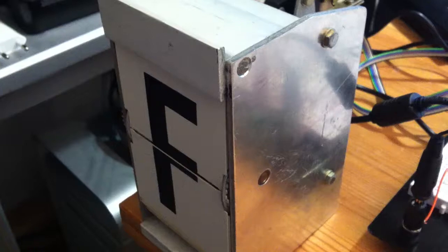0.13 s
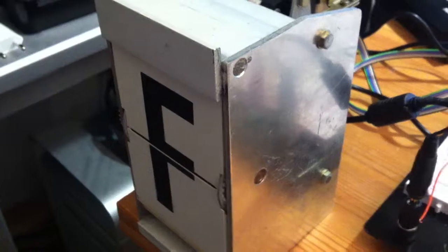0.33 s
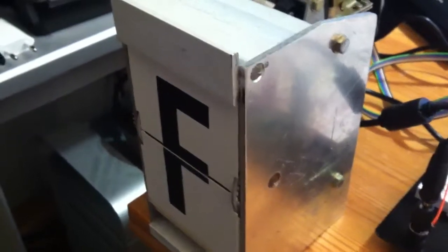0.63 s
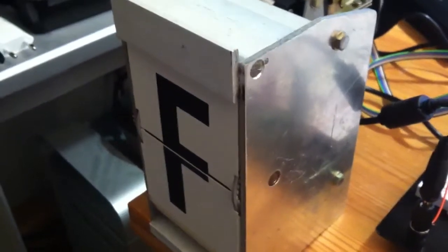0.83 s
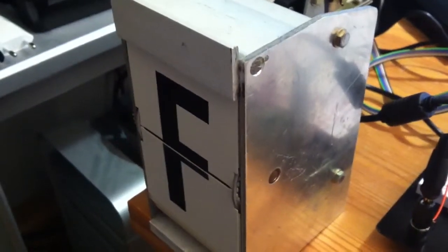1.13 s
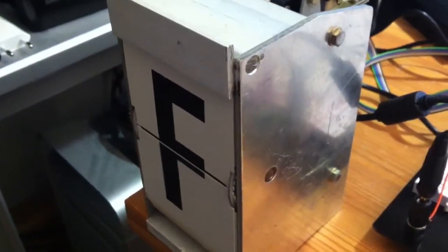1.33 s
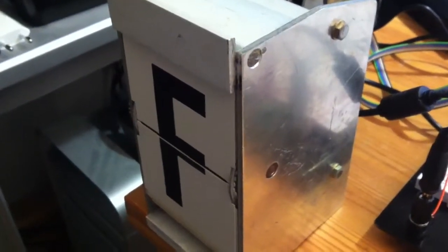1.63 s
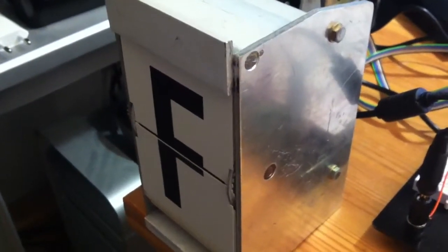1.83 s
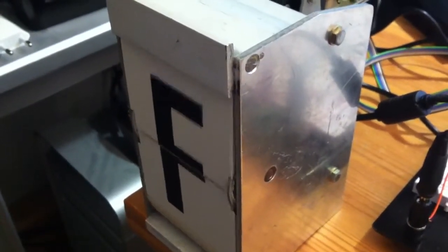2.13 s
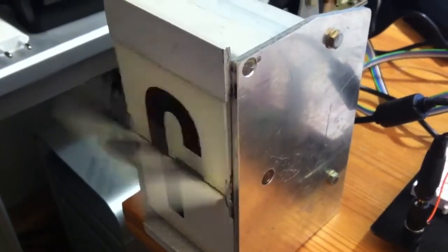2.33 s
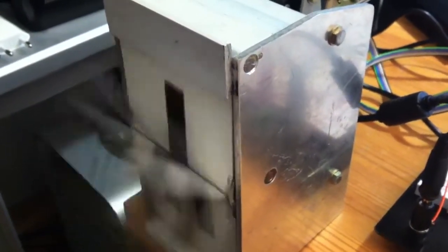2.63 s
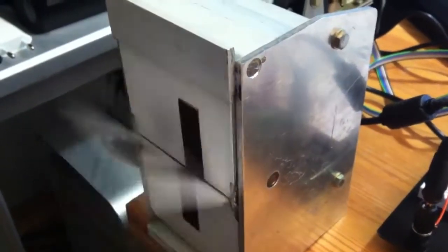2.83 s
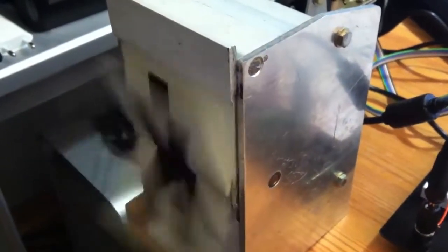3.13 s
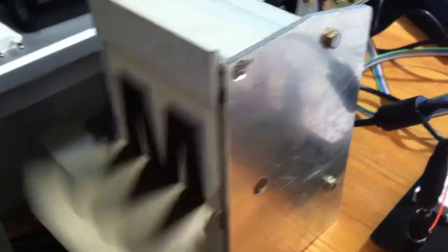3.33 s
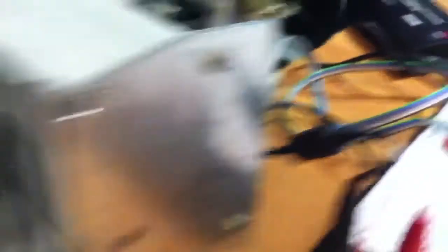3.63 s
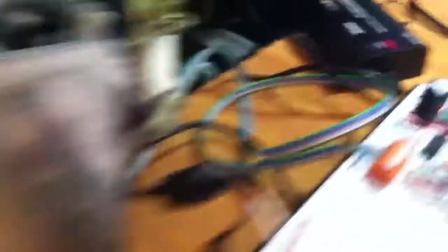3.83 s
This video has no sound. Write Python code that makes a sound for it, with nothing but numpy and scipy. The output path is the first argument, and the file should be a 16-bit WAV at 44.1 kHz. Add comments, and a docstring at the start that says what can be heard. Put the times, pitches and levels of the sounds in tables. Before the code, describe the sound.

A split-flap display starts flipping on a desk, close and mono. After a tiny silence, low steady hiss and hum; faint key clicks at 1.8 and 1.87 s. From 2.2 s to the end at 4 s, about six steps a second: tick, short gap, bright metallic tooth rattle, then flap slaps with hollow thumps. Hardest snap near 2.78 s, brief squeak at 3.36 s; rustling, bass shaking and short room tail.

```python
"""A split-flap drive steps about six times a second on a desk in a quiet room, close to a mono microphone. Each
step is a first tick, a short gap and a fast rattle of teeth: force envelopes on noise ring frame and plate.
Between steps flaps slap (noise cracks, resonant thumps), edges snap, brief tones squeak, the loose stack
rustles. Two key clicks come first. Behind it all: a short room tail, a lumpy low rumble, steady hiss and
humming bands."""
import sys
import numpy as np
from scipy import signal
from scipy.fft import rfft, irfft, next_fast_len
from scipy.io import wavfile
from scipy.ndimage import map_coordinates

SR = 44100
rng = np.random.default_rng(int(sys.argv[2]) if len(sys.argv) > 2 else 0)


def store_wav(level_fs):
    """Save 16-bit WAV to argv[1]."""
    pcm = np.round(np.clip(np.atleast_2d(level_fs), -1, 1) * 32767)
    wavfile.write(sys.argv[1], SR, pcm.T.astype(np.int16))


N = 176400


def amp(db):
    """Decibels to amplitude."""
    return 10 ** (np.asarray(db) / 20)


def unit(x):
    """Scale to rms 1."""
    return x / np.sqrt(np.mean(x ** 2) + 1e-20)


def along(points, hz):
    """Interpolate (f/Hz, value) points on a log frequency axis."""
    f, value = np.transpose(points)
    return np.interp(np.log(hz + 1), np.log(f + 1), value)


def level(rows):
    """A (t/s, level/dB) curve per sample, at -120 dB before its first point."""
    s, db = np.transpose(rows)
    return np.interp(np.arange(N) / SR, s, db, left=-120)


def wobble(rate):
    """A smooth random curve with `rate` knots a second."""
    knots = rng.standard_normal(int(N * rate / SR) + 4)
    return map_coordinates(knots, [np.arange(N) * rate / SR])


def filtered(x, response):
    """Multiply the spectrum of x by a complex response of frequency."""
    m = next_fast_len(N + SR // 2)
    return irfft(rfft(x, m) * response(np.fft.rfftfreq(m, 1 / SR)), m)[..., :N]


def resonances(table):
    """Response of a body: a causal sum of damped resonances with alternating signs."""
    def response(f):
        return sum((-1) ** k * amp(db) * 1j * f * width / (centre ** 2 - f * f + 1j * f * width)
                   for k, (centre, width, db) in enumerate(table))
    return response


def noise(spectrum):
    """Coloured noise of rms 1."""
    return unit(filtered(rng.standard_normal(N), lambda hz: amp(along(spectrum, hz))))


def add_blow(envelope, s, db, t60, attack):
    """Add one blow to an envelope: quick rise, exponential fall."""
    t = np.arange(N) / SR - s
    on = slice(max(round(s * SR), 0), round(s * SR) + SR // 8)
    envelope[on] += amp(db - 60 * t[on] / t60) * (1 - np.exp(-np.abs(t[on]) / attack))


MODE_DRIFT_DB, MODE_DRIFT_RATE = 2, 40  # depth in dB, knots a second


def rung(force, table):
    """Noise under the force rings a body; each mode is caught more or less as the contact point moves."""
    grit = rng.standard_normal(N)
    total = 0
    for k, row in enumerate(table):
        caught = amp(MODE_DRIFT_DB * wobble(MODE_DRIFT_RATE))
        total = total + (-1) ** k * filtered(force * grit * caught, resonances([row]))
    return total / np.std(filtered(grit, resonances(table)))


# Spectrum of the steady hiss: f/Hz, relative level/dB per Hz
HUSH_SPECTRUM = [(15, -63), (25, -31), (70, -50), (86, -8), (211, -1.5), (284, -2.5), (324, -10.5),
                 (461, -15), (791, -11), (1820, -11), (15800, -20)]
# Humming bands: f/Hz, width/Hz, level/dB
HUM_BANDS = [(231, 90, -74), (470, 60, -74), (753, 6.7, -80)]
HUSH_DB = -63


def hush():
    """Steady hiss of the quiet room with a few humming bands of narrow noise."""
    hum = np.zeros(N)
    for row in HUM_BANDS:
        band = filtered(rng.standard_normal(N), resonances([row]))
        hum += amp(row[2]) * unit(band)
    return amp(HUSH_DB) * noise(HUSH_SPECTRUM) + hum


# Decay of the room: f/Hz, t60/s
ROOM_DECAY = [(300, 0.9), (1400, 0.63), (5000, 0.26), (10000, 0.17), (15000, 0.11)]
ROOM_DB = -11.5


def room(x):
    """Diffuse room tail: each frequency dies at its own speed; a new tail every fifth of a second."""
    out, hop = np.zeros(N + SR), SR // 5
    for i in range(0, N, hop):
        hz, t, z = signal.stft(rng.standard_normal(SR // 2), SR, nperseg=256)
        decay = amp(-60 * t / along(ROOM_DECAY, hz)[:, None])
        tail = signal.istft(z * decay, SR, nperseg=256)[1]
        wet = signal.fftconvolve(x[i:i + hop], tail / np.linalg.norm(tail))
        out[i + 200:][:len(wet)] += wet  # 200 samples behind the direct sound
    return out[:N]


# Low rumble that comes and goes: t/s, relative level/dB
RUMBLE_CURVE = [(2.2, -79), (2.48, -70), (2.72, -90), (3.012, -67), (3.036, -86), (3.102, -55),
                (3.192, -82), (3.858, -58), (4.0, -81)]
# Its spectrum: f/Hz, relative level/dB per Hz
RUMBLE_SPECTRUM = [(20, -20), (30, -9), (110, -2), (160, -16), (300, -60)]


def rumble():
    """Lumpy bass noise that swells and fades."""
    return amp(level(RUMBLE_CURVE) - 7.5 + 2.4 * wobble(17)) * noise(RUMBLE_SPECTRUM)


# Loose flaps shifting: t/s, relative level/dB
RUSTLE_CURVE = [(2.22, -75), (2.284, -45), (2.402, -61), (2.456, -49.5), (2.586, -55), (2.704, -54),
                (2.804, -50.5), (2.988, -54), (3.33, -48.5), (3.438, -50.5), (3.538, -58), (3.662, -49),
                (4.0, -45)]
# Their spectrum: f/Hz, relative level/dB per Hz
RUSTLE_SPECTRUM = [(65, -38), (110, -6), (1380, 3), (1800, -3), (2130, -4.5), (2970, 3), (3510, -21.5),
                   (5160, -0.5), (6000, -8), (7800, -42), (13200, -120)]
RUSTLE_DB, RUSTLE_LUMPS_DB = 4, 5
TICKS_PER_S, TICK_DB, TICK_SPREAD_DB, TICK_T60 = 100, -1, 11, 0.0074  # stray contacts; t60 in s


def rustle():
    """Lumpy low noise of flaps swinging against each other, with stray ticks that ring the plate."""
    db, ticks = level(RUSTLE_CURVE), np.zeros(N)
    chance = rng.uniform(size=(400, 2))
    times = RUSTLE_CURVE[0][0] + np.cumsum(chance[:, 0]) * 2 / TICKS_PER_S
    for s, size in zip(times, chance[:, 1]):
        if s < N / SR:
            tick_db = db[int(s * SR)] + TICK_DB + TICK_SPREAD_DB * size
            add_blow(ticks, s, tick_db, TICK_T60, TOOTH_ATTACK_S)
    swell = amp(db + RUSTLE_DB + RUSTLE_LUMPS_DB * wobble(70))
    lumps = swell * noise(RUSTLE_SPECTRUM)
    return lumps + amp(-10) * ticks * noise(CRACK_SPECTRUM) + amp(5.0) * rung(ticks, PLATE_MODES)


SETTLE_S, SETTLE_DB = 0.0039, -7.5  # spacing scale of the contacts, change from one to the next
THUMP_S = 0.00022  # contact time


def landings(rows, modes, edge_spectrum):
    """A short noise crack and a hollow thump; each landing is three quick contacts, each weaker."""
    crack, push = np.zeros(N + SR), np.zeros(N + SR)
    all_flights = rng.uniform(0.496, 1.477, (len(rows), 3))
    for (s, crack_db, thump_db, t60), flights in zip(rows, all_flights):
        add_blow(crack[:N], s, crack_db, t60, attack=0.00087)
        for k, late in enumerate(np.cumsum(flights) - flights[0]):
            push[round((s + SETTLE_S * late) * SR)] += amp(thump_db + SETTLE_DB * k)
    body = resonances(modes)

    def soft_body(hz):
        return body(hz) / (1 + 2j * np.pi * hz * THUMP_S)

    peak = np.abs(filtered(np.arange(N) == 0, soft_body)).max()  # one contact peaks at its own level
    return .5 * crack[:N] * noise(edge_spectrum) + filtered(push[:N], soft_body) / peak


# Knocks of the two key clicks: t/s, relative crack level/dB, thump peak level/dB, crack t60/s
KEY_KNOCKS = [(1.781, -40.5, -46.5, 0.024), (1.859, -39, -41, 0.052), (1.868, -53, -40.5, 0.023),
              (1.881, -53, -49, 0.046)]
# Desk under the keys: f/Hz, width/Hz, relative level/dB
DESK_MODES = [(284, 48, 2.5), (470, 170, 1), (1140, 190, -3), (1600, 270, -4)]
# Spectrum of the key crack: f/Hz, relative level/dB
CLICK_SPECTRUM = [(1500, -28), (4000, -10), (6500, -1), (9000, -3), (13000, 0), (15800, -9)]


def key_clicks():
    """Each knock of a key cracks and thumps the desk under it."""
    return landings(KEY_KNOCKS, DESK_MODES, CLICK_SPECTRUM)


# Brief tones: t/s, rise/s, f/Hz, level/dB, t60/s
SQUEAK_TONES = [(3.36, 0.0064, 4480, -24.5, 0.024), (2.8, 0.076, 738, -41.5, 0.26)]


def squeaks():
    """Short sine tones that swell and die."""
    t, out = np.arange(N) / SR, np.zeros(N)
    for s, rise, hz, db, t60 in SQUEAK_TONES:
        swell = np.clip((t - s) / rise, 0, 1)
        fall = amp(db - 60 * np.clip(t - s - rise, 0, 1) / t60)
        out += fall * swell * np.sin(2 * np.pi * hz * t)
    return out


# A flap edge snaps off its catch: t/s, impulse level/dB
SNAP_TIMES = [(2.7830, -5), (3.1545, -9), (3.3198, -5)]
# Resonances of the snap: f/Hz, width/Hz, level/dB
SNAP_MODES = [(1500, 2300, -27), (4500, 1200, 12), (9100, 9900, 2)]


def snaps():
    """Single hard impulses through broad resonances as a flap edge snaps off its catch."""
    blows = np.zeros(N)
    for s, db in SNAP_TIMES:
        blows[round(s * SR)] = amp(db)
    return filtered(blows, resonances(SNAP_MODES))


# Flap landings: t/s, relative crack level/dB, thump peak level/dB, crack t60/s
FLAP_SLAPS = [(2.317, -30, -43, 0.036), (2.3485, -17, -39, 0.025), (2.466, -39, -43, 0.062),
              (2.473, -23, -74, 0.032), (2.597, -17, -32.5, 0.038), (2.782, -7.5, -27.5, 0.023),
              (2.818, -24, -53, .03), (2.8952, -20, -30, 0.022), (2.998, -30, -37, 0.051),
              (3.02, -37, -38.5, 0.015), (3.099, -20.5, -28.5, 0.023), (3.192, -27, -41, 0.064),
              (3.203, -35, -42, .03), (3.288, -26, -31, 0.016), (3.3195, -15, -37, 0.026),
              (3.3632, -24.5, -41, 0.057), (3.38, -30, -39, 0.027), (3.404, -39, -46, 0.039),
              (3.4275, -41, -27, 0.035), (3.497, -14, -34, 0.022), (3.535, -15, -31.5, 0.016),
              (3.5408, -23, -38.5, 0.049), (3.686, -44, -38.5, .031), (3.696, -23, -40, 0.034),
              (3.71, -49, -41, 0.028), (3.7233, -18.5, -34.5, 0.042), (3.742, -35, -40, 0.01),
              (3.853, -22, -31.5, 0.015), (3.8825, -23, -42, 0.031), (3.889, -24, -38, 0.023),
              (3.9165, -20.5, -33.5, 0.018), (3.931, -37, -45, 0.013), (3.941, -51, -60, 0.026)]
# Flap stack and housing: f/Hz, width/Hz, relative level/dB
FLAP_MODES = [(208, 51, -9.5), (409.6, 94, -2), (456.6, 48.4, 3), (528, 30, -6.5), (970, 400, -6.5)]
# Spectrum of the flap crack: f/Hz, relative level/dB
CRACK_SPECTRUM = [(300, -56), (1200, 5.5), (2500, 2), (4500, 4), (8000, 3.5), (12000, 1), (15500, -11.5)]


def flap_slaps():
    """Falling flaps crack at the edge and thump the stack and housing."""
    return landings(FLAP_SLAPS, FLAP_MODES, CRACK_SPECTRUM)


FIRST_DB, FIRST_T60 = -5, 0.046  # first tick; t60 in s
ONSET_S, ONSET_DB = .003, -15  # a faint soft onset 3 ms before the first tick
RISE_DB, RISE_S = -7.5, .015  # the rattle starts lower and swells
TOOTH_ATTACK_S, TOOTH_T60 = .0006, 0.013  # both in s
TOOTH_JITTER, TOOTH_SCATTER_DB, TOOTH_DB = 0.028, 1, 1  # jitter as a share of the tooth period
SCRAPE_FADE_S, SCRAPE_FLUTTER_DB = 0.0013, -4.5
TREBLE_CRISP = 0.88  # exponent on the force for the bright grit
PLATE_DB, BROAD_DB = -8, -6
THIN_HZ = 770  # small parts radiate little bass
# Runs of the drive: t/s, length/s, relative level/dB, gap after first tick/s, tooth period/s,
# scrape relative level/dB, sag over the run/dB, grit relative level/dB
DRIVE_RUNS = [(2.2044, 0.066, -22, 0.0113, 0.0067, -6.5, 2, -1),
              (2.3773, 0.051, -20, 0.0111, 0.0085, -1.5, 9.5, 0),
              (2.4318, 0.031, -21, 0.0085, 0.0072, -14.5, 6.5, 2),
              (2.5726, 0.073, -23, 0.0117, 0.0083, -1, 6, 0),
              (2.7335, 0.069, -21.5, 0.0134, 0.0039, -5.5, 3.7, -1.5),
              (2.9062, 0.087, -21, 0.0142, .008, -0.5, 12, 0.5),
              (3.0927, 0.07, -19, 0.0063, 0.008, -6.5, 2, 0.5),
              (3.256, 0.061, -20.5, 0.0088, 0.0077, -6, 1.7, 2),
              (3.4277, 0.079, -18, 0.0082, 0.0052, -6.5, 12, 2.3),
              (3.608, 0.059, -19, 0.0083, 0.0074, -8, 2, 3.5), (3.7673, .044, -20, .0104, .0074, -18, 1, 2),
              (3.8202, .030, -21, .0091, .0078, -18, -1, 2),
              (3.95, 0.043, -18.5, 0.0126, 0.00556, -8, -1.2, 1.5)]
# Metal frame: f/Hz, width/Hz, relative level/dB
FRAME_MODES = [(1368, 98, -2), (2116, 69, -6), (2576, 71, -2.5), (4026, 62, -10), (5000, 383, -6),
               (6420, 135, 0.5), (7730, 280, -10.5), (7780, 70, 1), (8742, 235, 1.5), (9920, 220, -4.5),
               (11184, 290, -6.5), (12130, 145, -6.5), (14750, 740, -6), (16350, 160, -30)]
# Side plate: f/Hz, width/Hz, relative level/dB
PLATE_MODES = [(1442, 30, 4), (2156, 35, -4), (2960, 35, -8), (4026, 50, -5), (4850, 40, -5),
               (5250, 30, -1), (6173, 25, -5), (6695, 35, -6), (7805, 40, -3), (8594, 25, -5),
               (8725, 25, 3), (9540, 50, -6), (10547, 40, -6), (13000, 120, -4)]
# Spectrum of the bright grit: f/Hz, relative level/dB per Hz
GRIT_SPECTRUM = [(600, -25.5), (1200, -8), (3000, -7), (6000, -9), (9000, -4.5), (12500, -6.5),
                 (14500, -4.5), (15800, -12.5)]


def drive():
    """Teeth tick over a fluttering scrape; both ring frame and plate and throw off bright grit."""
    force, bright, t = np.zeros(N), np.ones(N), np.arange(N) / SR
    flutter = amp(SCRAPE_FLUTTER_DB * wobble(370))
    for s, length, db, gap, period, scrape_db, sag_db, grit_db in DRIVE_RUNS:
        def shape_db(u):
            return db + RISE_DB * np.exp(-np.abs(u - gap) / RISE_S) - sag_db * u / length

        add_blow(force, s - ONSET_S, db + ONSET_DB, FIRST_T60, ONSET_S)
        add_blow(force, s, db + FIRST_DB, FIRST_T60, TOOTH_ATTACK_S)
        for k, (shift, size) in enumerate(rng.standard_normal((16, 2))):
            u = gap + period * (k + TOOTH_JITTER * shift * (k > 0))
            if u < length:
                tooth_db = shape_db(u) + TOOTH_DB + TOOTH_SCATTER_DB * size
                add_blow(force, s + u, tooth_db, TOOTH_T60, TOOTH_ATTACK_S)
        u = t - s
        fade_in = np.clip((u - gap) / SCRAPE_FADE_S, 0, 1)
        fade_out = np.exp(-np.clip(u - length, 0, 1) / SCRAPE_FADE_S)
        force += fade_in * fade_out * flutter * amp(shape_db(np.clip(u, 0, length)) + scrape_db)
        bright[u > 0] = amp(grit_db)  # holds until the next run
    crisp = force ** TREBLE_CRISP
    crisp *= bright * np.std(force) / np.std(crisp)
    metal = rung(force, FRAME_MODES) + amp(PLATE_DB) * rung(force, PLATE_MODES)
    thin = filtered(metal, lambda hz: (1j * hz / (THIN_HZ + 1j * hz)) ** 2)
    return thin + amp(BROAD_DB) * crisp * noise(GRIT_SPECTRUM)


def scene():
    """Hits with their room tail over the background, the same in both channels."""
    hits = drive() + flap_slaps() + key_clicks() + snaps() + squeaks()
    mono = hits + amp(ROOM_DB) * room(hits) + rustle() + rumble() + hush()
    return np.array([mono, mono])


START_S, TOP_HZ = 0.12, 15850


def record(dry):
    """At the microphone: sound begins after a short silence; nothing passes above the band limit."""
    started = np.arange(N) / SR > START_S
    return filtered(dry * started, lambda hz: hz < TOP_HZ)


dry = scene()
out = record(dry)
store_wav(out)
```